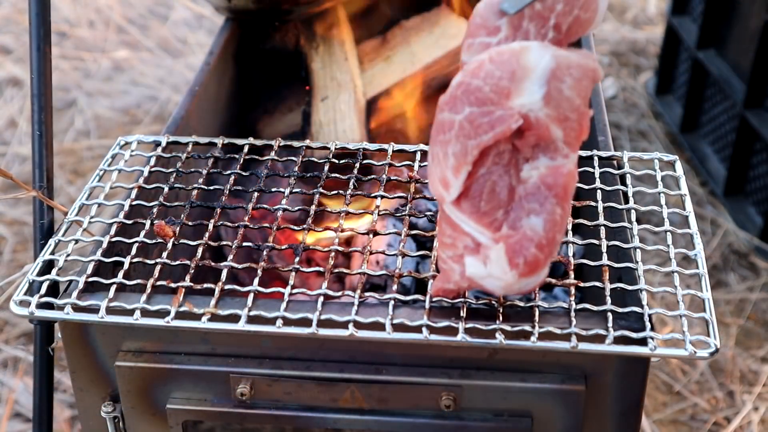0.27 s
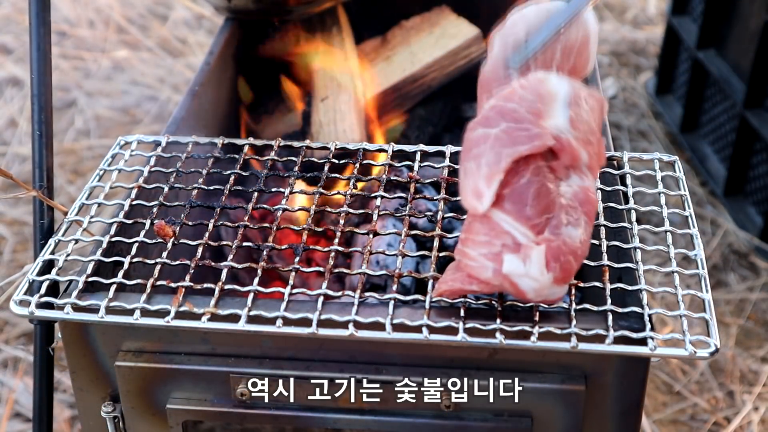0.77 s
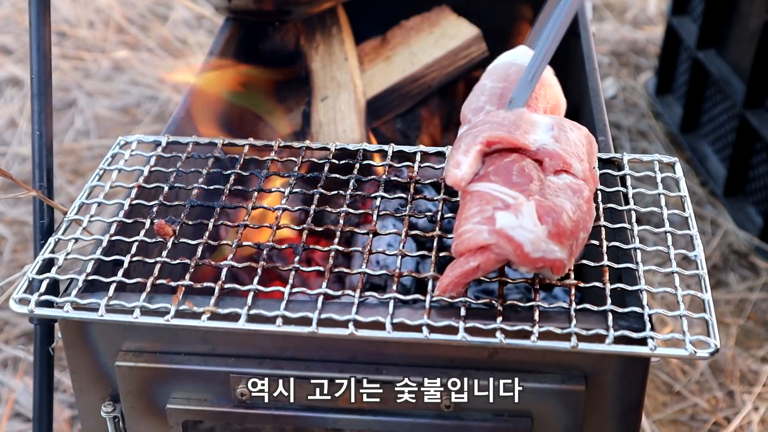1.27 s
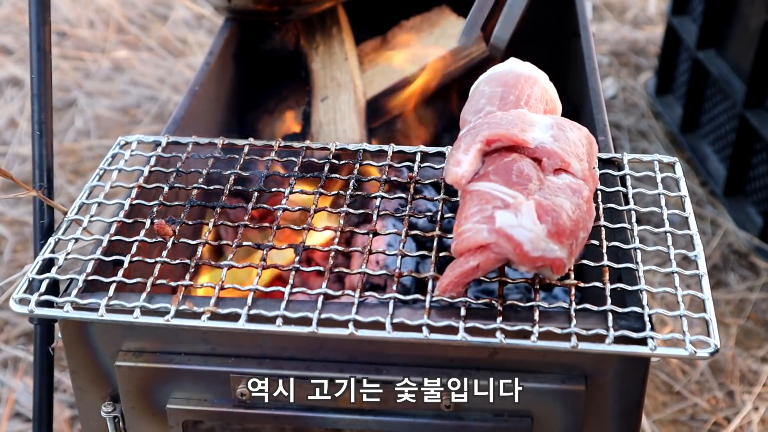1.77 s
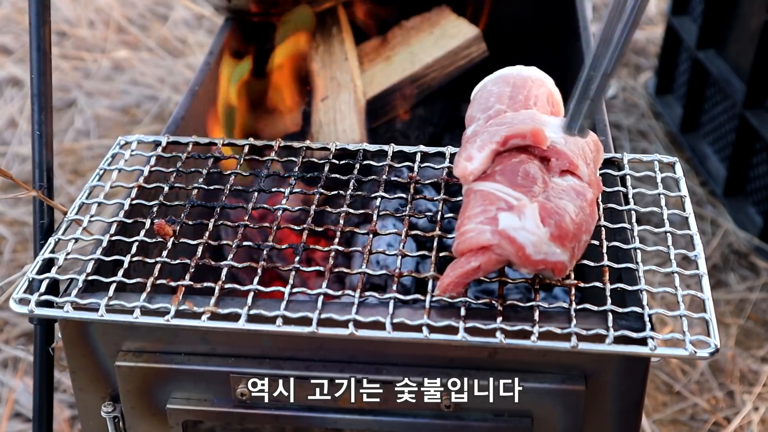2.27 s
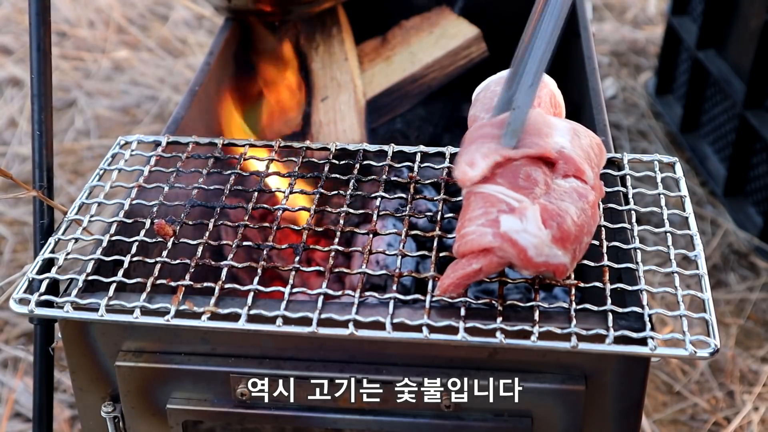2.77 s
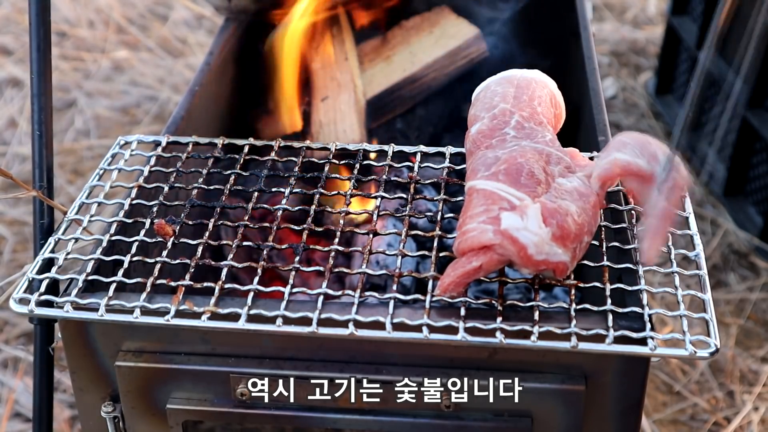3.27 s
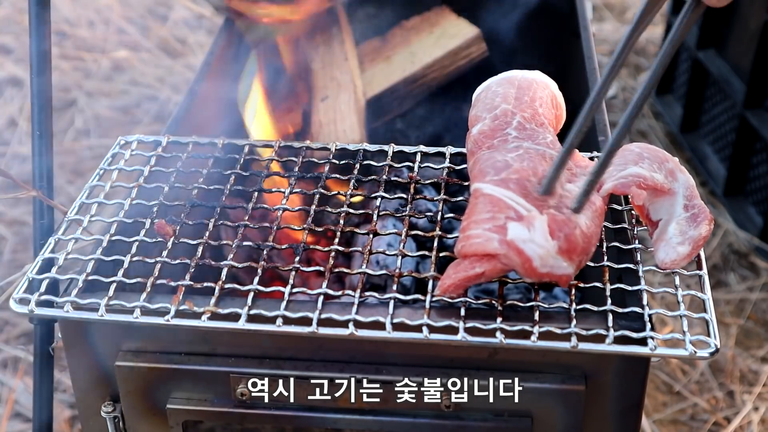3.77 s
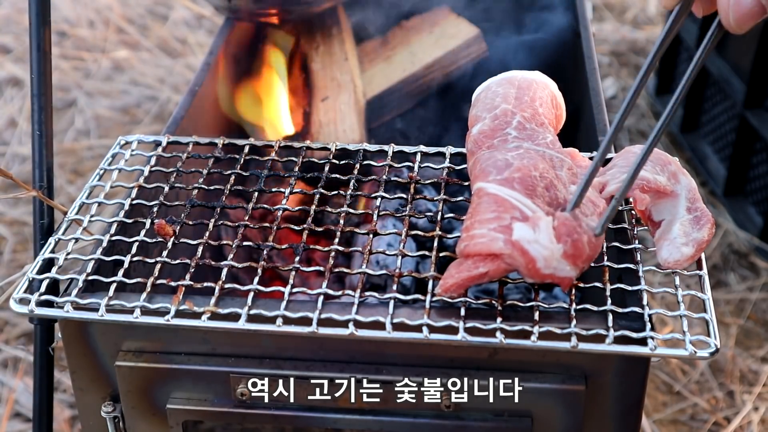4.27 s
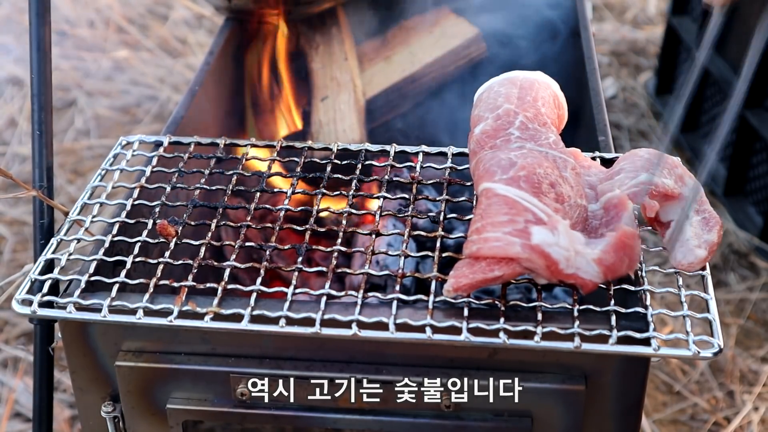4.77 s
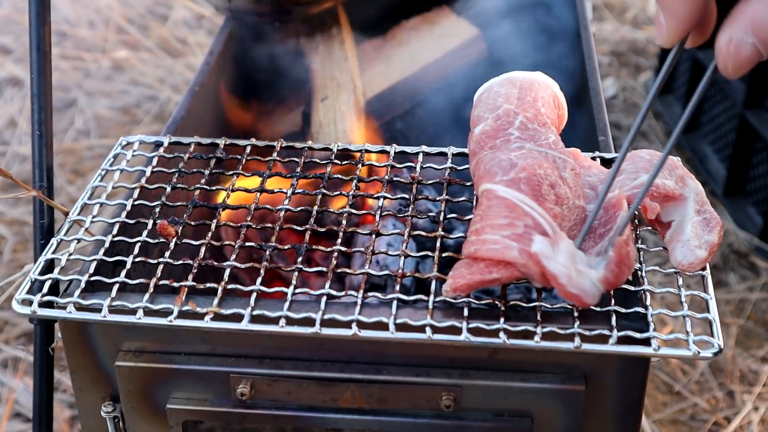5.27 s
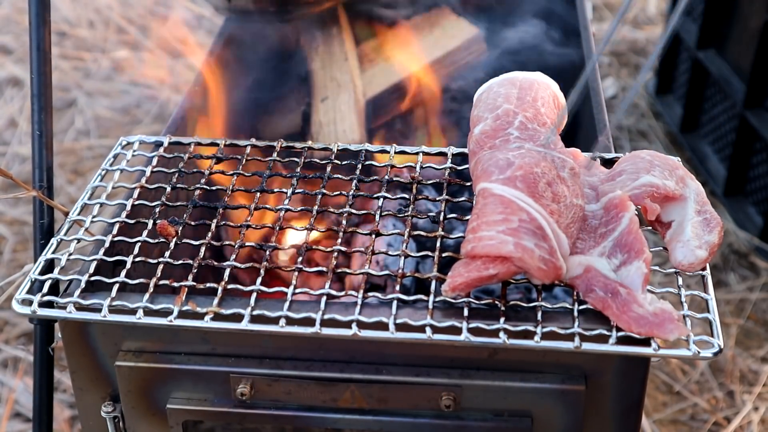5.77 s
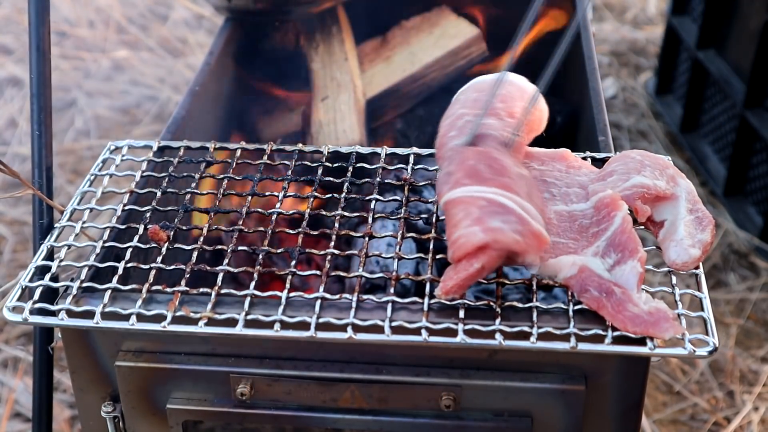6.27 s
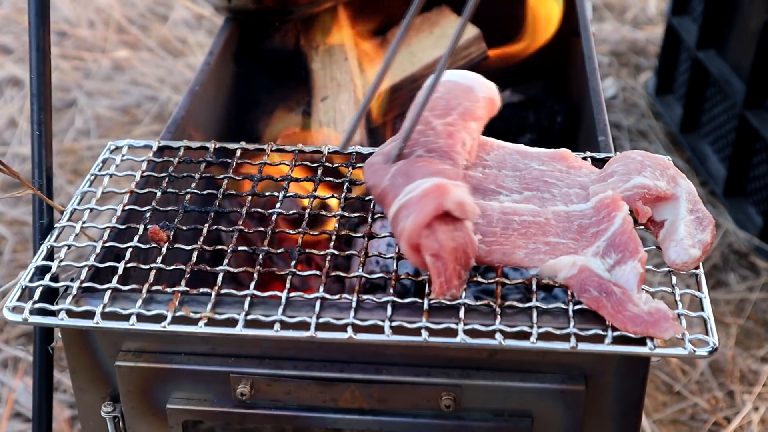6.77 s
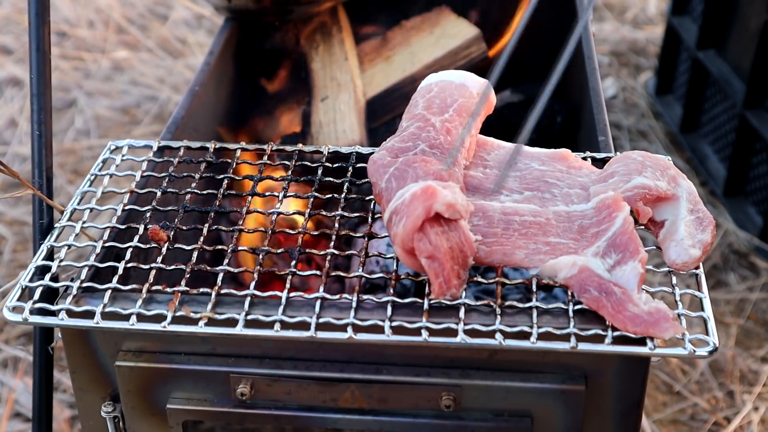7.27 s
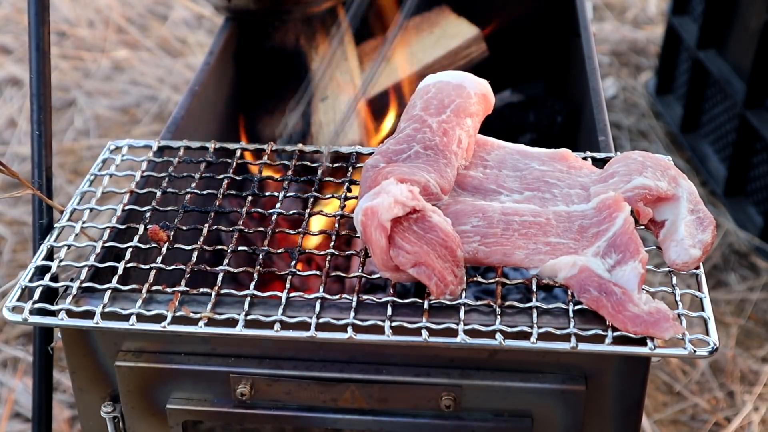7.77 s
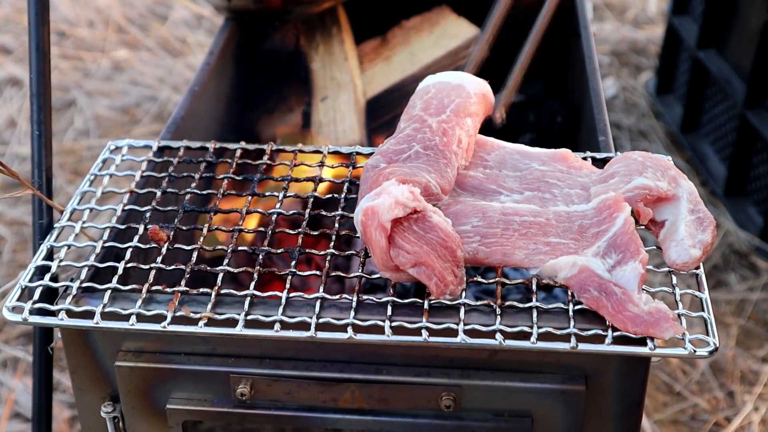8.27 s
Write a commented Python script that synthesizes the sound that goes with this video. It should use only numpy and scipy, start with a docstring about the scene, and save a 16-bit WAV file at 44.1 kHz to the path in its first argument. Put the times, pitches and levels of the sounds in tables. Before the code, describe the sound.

Very close, dry outdoor sound of pork on a wire grate over a small wood and charcoal fire. At 0-0.7 s meat rubs the wires, tongs tink lightly, two dull metal knocks come at 0.2 and 0.45 s, flames puff and the first brief sizzles spit. Around 1.07 s a loud, rattling double steel clank lands as sizzling swells. From 1.2 to 4 s bright hiss comes in waves, with crisp fat pops, a strong one near 2.3 s, and a tiny wood tick at 3.1 s. At 4.3 s a log cracks with a loud dry knock. The sizzle thins near 5-6 s; then around 6.2 s meat drags softly and flames puff and hoot upward. From 6.4 s frying is fuller and steamier, with a sharp thin snap at 7.0 s, a flame puff at 7.2 s, popping fat and a last hissing surge near 8.4 s.

```python
"""Pork slices sizzle on a wire grate: swells of tiny bubble bursts and steam hiss, with sharper fat spits.
A small wood and charcoal fire flutters underneath: filtered noise roars and rushes, gas pockets puff,
flame tongues hoot at climbing pitches. Noise bursts and decaying modes make the steel clank, loudest near
1 s, the wire tink and the burning wood snap three times. Meat drags over the wires as jerky noise."""
import sys
import numpy as np
from scipy import signal
from scipy.fft import rfft, irfft
from scipy.io import wavfile
from scipy.ndimage import uniform_filter1d

SR = 44100
rng = np.random.default_rng(int(sys.argv[2]) if len(sys.argv) > 2 else 0)


def digitize_waveform(pressure):
    """Quantize a signal to 16-bit integers and store it at the path in sys.argv[1].

    Rows of a 2-D input are taken as channels; values are limited to [-1, 1].
    """
    field = np.atleast_2d(pressure).T
    bounded = np.clip(field, -1, 1)
    quanta = np.round(bounded * 32767).astype(np.int16)
    wavfile.write(sys.argv[1], SR, quanta)


N = 375732
TIME = np.arange(N) / SR
FINE_HZ = 10500  # the finest spray lies above this

# spectrum of the fine spray: hz, level_db
SPRAY_SPECTRUM = [(2400, -28.5), (5100, -10), (6850, -3.5), (7600, 0.2), (8350, 2.5), (9250, -2.5),
                  (10400, -8), (11300, -4), (12400, -2), (13600, -1.2), (14900, -14), (15700, -4)]
# spectrum of the coarse frying: hz, level_db
FRYING_SPECTRUM = [(300, -17.5), (620, -6), (800, -2), (1000, -10), (1300, 1.5), (1550, -0.5), (1820, -0.5),
                   (2350, -3), (2780, 2), (3000, -1), (3700, 2), (4300, 0.5), (4950, 4.5), (5600, 2),
                   (6200, 3), (6800, 1), (10000, -5.5)]


def undb(db):
    """Decibels to gain."""
    return 10 ** (np.asarray(db) / 20)


def unit(x):
    """Scale to rms 1."""
    return x / np.sqrt(np.mean(x ** 2))


def curves(table):
    """Each column of a curve table, interpolated sample by sample."""
    s, *columns = np.transpose(table)
    return [np.interp(TIME, s, column) for column in columns]


def add(track, start_s, sound):
    """Mix a short sound into a track."""
    start = max(int(start_s * SR), 0)
    track[start:start + len(sound)] += sound[:max(N - start, 0)]


def response(spectrum, size=4096):
    """Minimum-phase impulse response of a spectrum, with unit energy."""
    hz, db = np.transpose(spectrum)
    bins_hz = np.maximum(np.arange(size // 2 + 1) * SR / size, 1)
    gain = undb(np.interp(np.log(bins_hz), np.log(hz), db))
    cepstrum = irfft(np.log(gain))
    # fold the cepstrum to make the response causal
    cepstrum[1:size // 2] *= 2
    cepstrum[size // 2 + 1:] = 0
    h = irfft(np.exp(rfft(cepstrum)))
    return h / np.sqrt(np.sum(h ** 2))


def colour(x, spectrum):
    """Filter a sound with a spectrum."""
    return signal.oaconvolve(x, response(spectrum))[:len(x)]


def highpass(x, hz, order=2):
    """Take away the bass below hz."""
    return signal.sosfilt(signal.butter(order, hz, "high", fs=SR, output="sos"), x)


def walk(rate_hz):
    """Slow chance: random levels joined by ramps, rms 1."""
    step = max(int(SR / rate_hz), 1)
    levels = np.repeat(rng.standard_normal(N // step + 1), step)
    return unit(uniform_filter1d(levels, step)[:N])


def flurries(rate_hz, decay_s):
    """Chance that jumps up at random moments and dies back; mean 0, spread 1."""
    jumps = (rng.random(N) < rate_hz / SR) * rng.uniform(0.59, 1, N)
    level = np.sqrt(signal.lfilter([1], [1, -np.exp(-1 / (decay_s * SR))], jumps))
    return unit(level - np.mean(level))


def bursts(rate_hz, spread_db, limit=4):
    """Random impulses of either sign, with exponentially spread levels in dB; rms 1."""
    happens = rng.random(N) < rate_hz / SR
    size = undb(spread_db * np.minimum(rng.exponential(size=N), limit))
    return unit(happens * size * rng.choice([-1, 1], N))


def strays(level_db, over_db, spread_db, count):
    """Small events at random moments that follow a level: start_s, level_db, a deviation of spread 1."""
    at = rng.integers(0, N, count)
    size, deviation = rng.standard_normal((count, 2)).T
    event_db = level_db[at] + over_db + spread_db * np.clip(size, -2, 1.5)
    return zip(at / SR, event_db, deviation)


def ring(modes, t, disorder=0):
    """Free ringing of hz, level_db, t60_s modes; disorder puts the higher ones out of step."""
    hz = np.transpose(modes)[0]
    phases = disorder * 2 * np.pi * rng.random(len(modes)) * np.minimum(hz / 1000, 1) ** 2
    total = np.zeros(len(t))
    for (f, db, t60_s), phase in zip(modes, phases):
        total += undb(db) * np.sin(2 * np.pi * f * t + phase) * np.exp(-np.log(1000) * t / t60_s)
    return total


def crack(t, tail, decay_s):
    """One impulse and a short scatter from the surfaces nearby."""
    x = tail * rng.standard_normal(len(t)) * np.exp(-t / decay_s)
    x[0] = 1
    return x


def envelope(start_s, rise_s, hold_s, fall_s):
    """A rounded rise, a hold and an exponential fall."""
    age = TIME - start_s
    up = np.clip(age / rise_s, 0, 1)
    return up * (2 - up) * np.exp(-np.clip((age - rise_s - hold_s) / fall_s, 0, 20))


def together(parts):
    """Power sum of (gain, colour_db) parts: its level and its colour, both in dB."""
    power = sum(gain * gain for gain, _ in parts)
    coloured = sum(gain * gain * undb(db) ** 2 for gain, db in parts)
    return 10 * np.log10(power), 10 * np.log10(coloured / power)


def boiling():
    """Strength and freshness of the boil in dB: a simmer, and a swell at each touch of meat on hot wire."""
    # steady simmer of the meat on the grate: start_s, level_db
    simmer = [(0, -52), (.62, -52.5), (.85, -39.5), (2.3, -43.5), (3.05, -43.5), (3.6, -43.5), (4.9, -44),
              (5.7, -47.5), (6.0, -47), (6.4, -36), (7.3, -37), (8.5, -38.5)]
    # juice boils up, finer on fresh meat: start_s, level_db, rise_s, hold_s, fall_s, freshness_db
    swells = [(.17, -48, .1, .06, .04, 0), (0.273, -37.5, 0.11, 0.031, 0.019, 8),
              (0.499, -43.5, .005, 0.0056, 0.026, 8), (0.655, -39.5, 0.012, 0.089, 0.06, 6.5),
              (0.762, -34.5, 0.12, 0.33, 0.036, 2.5), (1.035, -29, 0.063, 0.079, 0.082, 2.5),
              (1.23, -33.5, 0.017, 0.024, 0.086, 1.5), (1.4, -40, 0.035, 0.27, 0.062, 2),
              (1.746, -36.5, 0.047, 0.23, .05, 2.5), (2.047, -29.5, 0.091, 0.023, 0.13, 2.5),
              (2.703, -40, 0.23, 0.029, .015, 3), (3.142, -33, 0.018, 0.11, 0.072, 2.5),
              (3.742, -39.5, 0.082, 0.09, 0.12, 1), (4.181, -39.5, 0.053, 0.084, 0.054, 1),
              (4.393, -35, 0.18, 0.028, 0.085, -2.5), (5.18, -41, 0.17, 0.044, 0.026, 1),
              (5.416, -35, 0.055, 0.019, 0.092, 2.5), (6.025, -43.5, .005, 0.03, 0.027, -11),
              (6.062, -37.5, 0.16, 0.25, 0.041, -1), (6.316, -34, 0.064, 0.32, .05, 0),
              (6.647, -30, 0.11, 0.19, 0.16, 0.5), (7.408, -33.5, 0.016, 0.24, 0.32, 0),
              (8.347, -27.5, 0.097, 0.028, 0.076, 3.5)]
    simmer_db, = curves(simmer)
    parts = [(undb(simmer_db), 2)]  # simmer freshness, dB
    for s, db, rise_s, hold_s, fall_s, fresh_db in swells:
        parts.append((undb(db) * envelope(s, rise_s, hold_s, fall_s), fresh_db))
    return together(parts)


def fizzle(grains, share, decay_s):
    """Each burst trails off in its own brief noise fizz, with a share of its energy."""
    pole = np.exp(-1 / (decay_s * SR))
    power = signal.lfilter([1 - pole], [1, -pole], grains ** 2)
    return unit(grains + np.sqrt(share * power) * rng.standard_normal(N))


def steamy(grains, steam_db):
    """Bursts mixed with a hiss of steam, at constant power."""
    return (grains + undb(steam_db) * rng.standard_normal(N)) / np.hypot(1, undb(steam_db))


def scatter(x, share, count=8):
    """Short echoes off meat, tongs and firebox come and go, so the colour keeps shifting."""
    lags = np.geomspace(.0008, .005, count) * SR
    echoes = sum(walk(2.6) * np.roll(x, int(lag)) for lag in lags)
    return unit(x + share * echoes)


def resonate(centre_hz, width_hz):
    """Noise in a resonance whose centre may move every sample."""
    pole = np.exp(-np.pi * width_hz / SR)
    noise = rng.standard_normal(N) + 1j * rng.standard_normal(N)
    baseband = signal.lfilter([1], [1, -pole], noise)
    return unit((baseband * np.exp(2j * np.pi * np.cumsum(centre_hz) / SR)).real)


def blisters(count, low_hz, high_hz, cycles, spread_db):
    """Larger bubbles of fat, each a tiny decaying ping at its own pitch."""
    t = TIME[:300]
    when, pitch, size = rng.random((count, 3)).T[:, :, None]
    hz = low_hz * (high_hz / low_hz) ** pitch
    gain = undb(-spread_db * np.log(size + 0.02))
    pings = gain * np.sin(2 * np.pi * hz * t) * np.exp(-t * hz / cycles)
    places = (when * N).astype(int) + np.arange(len(t))
    return unit(np.bincount(places.ravel(), pings.ravel(), N)[:N])


def sizzle(level_db, fresh_db):
    """Tiny bubbles burst over a hiss of steam; each burst has a bright spray and a coarser body."""
    # the gap under the meat rings faintly and changes as slices move: start_s, centre_hz, level_re_frying_db
    gap_curve = [(.5, 3560, -18), (1.1, 3680, -10), (1.35, 3487, -15), (2.3, 3404, -12.5),
                 (3.2, 3335, -9.5), (4.15, 3220, -13), (4.35, 2770, -9), (5.1, 2720, -37), (5.35, 3760, -9),
                 (6.0, 3780, -25), (6.6, 3766, -11.5), (8.5, 3835, -18)]
    # frying spectrum once the slices lie flat: hz, level_db
    flat_spectrum = [(300, -8), (620, -14), (820, -1.5), (1000, -17), (1280, 3.5), (1600, 2), (1900, 0),
                     (2200, -2), (2480, -4), (2850, 1.5), (3250, 0.5), (3750, 2), (4250, -0.5), (5150, 4),
                     (6500, -1), (10000, -11)]
    flat_s, flatten_s = 6.3, 0.14  # the slices are pulled flat across the grate: start, duration
    usual_boil_db, usual_bursts_hz = -37.5, 1800
    steam_db, flat_steam_db = -4.5, 5.5  # hiss re bursts, and its gain once flat

    gap_hz, gap_db = curves(gap_curve)
    flat = np.clip((TIME - flat_s) / flatten_s, 0, 1)
    hiss_db = steam_db + flat_steam_db * flat
    vigour_db = level_db - usual_boil_db
    # the coarse part falls behind as the boil grows and on fresh meat
    coarse_db = -4 - 0.23 * vigour_db - 0.56 * fresh_db

    # strong boiling has more bursts, so it sounds smoother
    rate_hz = usual_bursts_hz * undb(.35 * vigour_db)
    grains = bursts(rate_hz, spread_db=2.8, limit=5.0) / np.sqrt(rate_hz / np.mean(rate_hz))
    grains = grains * undb(1.0 * walk(160))  # little clusters, 1 dB deep
    grains = fizzle(grains, share=0.37, decay_s=0.0043)

    mist = scatter(steamy(grains, hiss_db), share=.06)
    spray = unit(colour(mist, SPRAY_SPECTRUM))
    finest = signal.sosfiltfilt(signal.butter(3, FINE_HZ, "high", fs=SR, output="sos"), spray)
    spray = unit(spray + (undb(fresh_db) - 1) * finest)

    boil = scatter(steamy(grains, hiss_db), share=.12)
    heaped_frying = unit(colour(boil, FRYING_SPECTRUM))
    flat_frying = unit(colour(boil, flat_spectrum))
    frying = (1 - flat) * heaped_frying + flat * flat_frying
    pings = blisters(count=2600, low_hz=1360, high_hz=9360, cycles=9.3, spread_db=5)
    gap = resonate(gap_hz, width_hz=300)
    coarse = unit(frying + undb(gap_db + 2 * walk(18)) * gap + undb(-18.5) * pings)
    coarse_db = coarse_db + 0.95 * flurries(49, decay_s=0.014)  # the frying also flickers alone

    # juice reaches the wire in quick and slower flurries
    uneven_db = 1.12 * flurries(62, decay_s=0.0025) + 0.78 * flurries(26, decay_s=0.029)
    return undb(level_db + uneven_db) * (undb(0.5) * spray + undb(coarse_db) * coarse)


def burning():
    """Strength and rush of the fire in dB: calm burning that licks up now and then, and gusts."""
    # the fire between gusts: start_s, level_db
    calm = [(0, -51.5), (.8, -52.5), (1.7, -52), (2.6, -54.5), (4.3, -54), (5.4, -55), (6.4, -51),
            (8.0, -55), (8.5, -50)]
    # gusts, with the rush of fast gas: start_s, length_s, level_db, rush_re_level_db
    gusts = [(-.03, 0.21, -46.5, -3.5), (0.215, 0.15, -41.5, 0.5), (0.414, 0.25, -43.5, -3.5),
             (0.927, 0.029, -45, 3), (1.227, 0.27, -46.5, -5), (1.477, 0.16, -46.5, -5),
             (1.863, 0.024, -60, 11), (2.15, 0.017, -49, -7), (2.373, 0.17, -47.5, -11),
             (2.8, 0.051, -46, -12), (2.84, 0.15, -63, 5), (3.17, 0.046, -57, -18), (3.27, 0.069, -48, -12),
             (3.97, 0.15, -50.5, -18), (4.552, 0.071, -51, -11), (4.784, 0.057, -42.5, 1.5),
             (4.99, 0.16, -47.5, -10), (5.54, 0.15, -47.5, -9), (5.705, 0.18, -46.5, -2.5),
             (6.05, 0.07, -46.5, 4.5), (6.115, 0.1, -43, 5.5), (6.344, 0.59, -62, 3),
             (7.158, 0.24, -46, -0.5), (7.402, 0.43, -48, -1.5), (7.87, 0.021, -54, 15.5),
             (8.411, 0.13, -43, -18)]
    rise_share, fall_s = 0.32, 0.017  # part of its length that a gust takes to build; its dying away
    calm_db, = curves(calm)
    licks_db = 2 * flurries(10, decay_s=0.033)
    parts = [(undb(calm_db + licks_db), 0)]  # calm rush, dB
    for s, length_s, db, rush_db in gusts:
        shape = envelope(s, rise_share * length_s, (1 - rise_share) * length_s, fall_s)
        parts.append((undb(db) * shape, rush_db))
    return together(parts)


def flames(level_db, rush_db):
    """Turbulent burning: an uneven low roar, and a higher rush when the gas speeds up."""
    # low roar: hz, level_db
    roar_spectrum = [(15, -24), (35, -5.5), (70, 0), (135, 1), (220, -4.5), (330, -13.5), (500, -16.5),
                     (800, -21), (1600, -30)]
    # rush of fast gas: hz, level_db
    rush_spectrum = [(150, -8), (300, -5), (430, 3.5), (600, -6), (900, -10.5), (1300, -11), (4000, -34)]
    flutter = bursts(260, spread_db=9.0, limit=2.95) + undb(-4.0) * rng.standard_normal(N)
    roar = undb(-1.5) * unit(colour(flutter, roar_spectrum))
    turbulence = bursts(500, spread_db=4.5, limit=3.9) + rng.standard_normal(N)
    rush = undb(rush_db - 4.5) * unit(colour(turbulence, rush_spectrum))
    return undb(level_db) * (roar + rush)


def rustle():
    """Meat sticks and slips softly over the wires in little jerks."""
    # bell-shaped drags: centre_s, half_width_s (to 1/e), level_db
    drags = [(0.092, 0.13, -47.5), (0.325, 0.04, -55), (4.815, .022, -52), (6.17, 0.054, -48)]
    # rubbing noise: hz, level_db
    rub_spectrum = [(400, -12), (700, 8), (970, 9.5), (1300, 5), (2100, 5.5), (3500, 0), (6000, 1.5),
                    (10000, -16.5)]
    drag = sum(undb(db) * np.exp(-((TIME - s) / half_width_s) ** 2) for s, half_width_s, db in drags)
    rub = colour(bursts(900, spread_db=-2.5), rub_spectrum)
    return drag * unit(undb(2.2 * walk(60)) * rub)


def puffs(roar_db):
    """A pocket of gas flares: one push of pressure, a shallow suction, and a short flutter in its wake."""
    # the largest pockets that catch fire: start_s, level_db, pitch_hz
    large = [(.034, -31, 380), (.192, -26, 360), (.229, -37, 350), (.26, -32, 400), (.303, -28, 400),
             (.32, -25, 350), (.337, -27, 334), (.397, -23, 400), (.454, -25, 260), (.525, -25, 300),
             (.557, -28, 280), (.59, -38, 300), (.608, -22, 340), (.956, -34, 330), (1.231, -32, 280),
             (1.429, -32, 260), (1.523, -24, 350), (1.55, -28, 230), (1.586, -26, 280), (1.604, -32, 350),
             (1.886, -30, 520), (2.072, -33.5, 380), (2.174, -35, 260), (2.458, -20.5, 293),
             (2.811, -27, 370), (2.883, -32, 400), (2.902, -29.5, 380), (2.989, -33, 400),
             (3.001, -32, 430), (3.091, -32, 380), (3.21, -34, 230), (3.314, -36, 300), (3.337, -41, 300),
             (3.391, -26, 320), (3.565, -36, 300), (3.572, -37, 300), (3.995, -32, 264),
             (4.573, -28.5, 288), (4.606, -26, 340), (4.82, -31, 380), (5.563, -35, 230),
             (5.601, -29.5, 320), (5.627, -29, 280), (5.637, -25.5, 270), (5.666, -36, 260),
             (5.727, -20, 276), (5.735, -34, 330), (5.772, -25.5, 260), (5.80, -27, 360), (6.067, -36, 380),
             (6.148, -25, 250), (6.211, -32, 380), (6.246, -17, 487), (6.259, -26, 380), (6.268, -22, 180),
             (6.294, -23, 564), (6.894, -34, 350), (6.955, -32, 300), (7.147, -35, 280), (7.198, -23, 368),
             (7.239, -31, 240), (7.26, -27, 260), (7.294, -31, 242), (7.322, -30, 300), (7.347, -30, 282),
             (7.385, -33, 300), (7.504, -30, 328), (7.552, -23.5, 405), (7.579, -32, 320),
             (7.594, -34, 330), (7.73, -29, 280), (7.887, -34, 453), (8.497, -31, 350)]
    usual_hz = 342
    wake_db, wake_rise_s = -20, 0.0033
    out, t = np.zeros(N), TIME[:2560]
    lead_s = TIME[512]  # room for the push to build before its peak
    age = np.maximum(t - lead_s, 0) / wake_rise_s
    wake = undb(wake_db) * age * np.exp(1 - age)
    chance = strays(roar_db, over_db=9, spread_db=3, count=32)
    small = [(s, db, usual_hz * np.exp(0.14 * z)) for s, db, z in chance]
    for s, db, hz in list(large) + small:
        u = (t - lead_s) * hz * 5.22
        push = np.exp(-u ** 2) - 0.14 * np.exp(-((u - 1.2) / 5.1) ** 2)
        band = signal.butter(2, [0.52 * hz, 1.54 * hz], "band", fs=SR, output="sos")
        eddies = unit(signal.sosfilt(band, rng.standard_normal(len(t))))
        add(out, s - lead_s, undb(db) * (push + wake * eddies))
    return highpass(out, hz=55)


def taps():
    """Light touches of the tongs make a wire tink in its decaying modes."""
    # touches: start_s, peak_db
    touches = [(.0868, -32), (.0895, -37), (0.111, -35), (4.776, -48)]
    # modes of the wire: hz, level_db, t60_s
    wire_modes = [(994, -1, 0.056), (1030, -4, 0.036), (1480, -10, .02), (2060, -3, .025),
                  (2420, 3.5, 0.018), (3400, -6, .012), (5060, -9, .01)]
    out = np.zeros(N)
    for s, db in touches:
        tink = ring(wire_modes, TIME[:4096], disorder=0.97)
        add(out, s, undb(db) * tink / np.max(np.abs(tink)))
    return out


def clanks():
    """Each blow rattles the grate densely and rings the steel until it is damped."""
    # blows on the steel, deadened by the meat: start_s, level_db, rattle_decay_s
    blows = [(0.196, -19, 0.002), (0.445, -19, 0.003), (1.0644, -2, 0.011), (1.0712, -2.5, 0.019),
             (1.0917, -7.5, 0.018)]
    # modes of the steel before that damping: hz, level_db, t60_s
    steel_modes = [(443, 4, .22), (474, 0, .22), (762, -5, .35), (940, -5, .2), (974, -.5, .3),
                   (1010, -2, .3), (1072, -8, .3), (1244, -11, .4), (1277, -5, .4), (1671, -4.5, .5),
                   (1770, -3, .5), (2339, -8, .3), (2433, -11, .3), (2780, -3.5, .4), (2952, -7, .35),
                   (3178, -9, .2), (3488, -10, .25), (3668, -11, .3), (3898, -9, .1), (4203, -10, .4),
                   (4355, -11, .2), (5230, -11, .2), (5830, -11, .15)]
    # rattle: hz, level_db
    thud_spectrum = [(50, -30), (130, 0), (340, -6.5), (450, 6), (610, -7), (780, -3), (950, 5), (1130, -3),
                     (1700, 1), (2000, -4), (2800, -3), (4000, -4), (5800, -6), (6500, -15), (15000, -23)]
    out, t = np.zeros(N), TIME[:SR // 4]
    for s, db, decay_s in blows:
        contacts = rng.standard_normal(len(t)) * (rng.random(len(t)) < 3800 / SR)
        rattle = unit(colour(contacts, thud_spectrum)) * np.exp(-t / decay_s)
        steel = ring(steel_modes, t, disorder=0.87) * np.exp(-t / (3.0 * decay_s))
        onset = 1 - np.exp(-t / (0.08 * decay_s))
        add(out, s, undb(db) * onset * (undb(-17.0) * rattle + undb(-26.5) * steel))
    return out


def spits(boil_db):
    """Single drops of fat burst with a sharp tick and a brief fizz; each has its own colour."""
    # the loudest drops, and at 1.066 s the bright crack of the first heavy blow on the steel: start_s,
    # level_db, low_body_re_top_db, finest_spray_lift_db
    large = [(.2924, -25, 3, 0), (.3618, -13, -18, 10), (.392, -17, -13, 4), (.4092, -16, -17, 12),
             (.4181, -17, -17, 10), (.5087, -16.5, -16, 8), (.58, -24, -7, 3), (.666, -18.5, -8, 2),
             (.6842, -13, -11, -1), (.6955, -23, -20, -2), (.7135, -16, -8, 3), (.719, -25, -5, 3),
             (.7444, -17, -24, 5.5), (.7823, -16, -17, 6), (.919, -17, -19, 8), (1.066, -10.5, -12, -5),
             (1.141, -17, -12, -1), (1.1859, -14, -10, 1), (1.1914, -22, -17, 5), (1.365, -19, -2, -3),
             (1.6204, -14, -3, 3), (1.6364, -21, -11, 4), (1.862, -15, -8, 0), (1.871, -14, -15, 2),
             (1.9237, -16, -14, 3), (2.025, -14, -14, 1), (2.1783, -12, -2, 1), (2.2315, -30, -28, -2),
             (2.307, -8.5, -10, 8), (2.5922, -25, 7, -1), (2.691, -25, -5, 4), (2.7558, -21.5, 4, -2),
             (2.806, -25, -3, 4), (2.894, -18, -14, 8), (2.9373, -12, 2.5, 2), (2.9439, -18, -12, 5),
             (2.9755, -22, 1, -3), (3.152, -16, -13, 7), (3.1639, -14, -8, 5), (3.194, -17, -4, 4),
             (3.212, -15, -2, 1), (3.339, -19, -8, 8), (3.349, -17, -18, 3), (3.389, -13, -5.5, 6),
             (3.3974, -30, -3, 3), (3.5905, -16.5, -1, 4), (3.841, -13.5, -8, 2), (3.846, -23, -14, 2),
             (3.9218, -22, -20, -14), (4.3667, -40, -14, -2), (4.3936, -22, -10, -2), (4.4183, -17, -3, 0),
             (4.4415, -21, -11, 5), (4.6064, -20, -12, -1), (4.879, -17.5, -11, 7), (5.2487, -22, -4, -3),
             (5.2986, -23.5, -20, -2), (5.362, -19, -6, 3), (5.509, -25, -12, 4), (5.541, -17, 3, -2),
             (5.602, -23, -1, -2), (5.7815, -35, -12, -5), (5.93, -18.5, -12, 6), (5.9845, -31, -14, 1),
             (6.544, -18, 3, -2), (6.583, -19, 5, 0), (6.7125, -19, -4, 0), (6.961, -12, -10, -1),
             (7.083, -19, 6, 0), (7.2593, -17, 3, -7), (7.456, -15, -4, 6), (7.492, -21, -4, 1),
             (7.53, -16, -16, 15), (7.735, -10.5, -6, 2), (7.789, -22, 8, 7), (7.8393, -17.5, 5, 3),
             (8.2903, -16.5, -9, 3)]
    out, t = np.zeros(N), TIME[:1024]
    body = highpass(response(FRYING_SPECTRUM, size=256), hz=900)
    chance = strays(boil_db, over_db=6, spread_db=4, count=60)
    small = [(s, db, -17 + 5 * z, 3 * rng.standard_normal()) for s, db, z in chance]
    for s, db, body_db, fine_db in list(large) + small:
        lifted = [(hz, level_db + fine_db * (hz > FINE_HZ)) for hz, level_db in SPRAY_SPECTRUM]
        tick = response(lifted, size=256) + undb(body_db) * body
        fizz = crack(t, tail=.07, decay_s=.0014)
        fizz = fizz + .018 * rng.standard_normal(len(t)) * np.exp(-t / .006)
        add(out, s, undb(db + 7.5) * np.convolve(fizz, tick / np.max(np.abs(tick))))
    return out


def snaps():
    """A steam pocket splits the log: a dry knock with a sharp edge; the smaller the split, the less bass."""
    # splits: start_s, peak_db, edge_re_knock_db, pitch_factor, thin_below_hz
    splits = [(3.1024, -21.5, -15, 1.1, 4000), (4.278, 0.2, -6.5, 1.0, 240), (7.0197, -3, 3.5, 0.99, 3000)]
    # modes of the log at pitch factor 1: hz, level_db, t60_s
    wood_modes = [(540, -15, 0.046), (830, 5, 0.013), (1260, -2, 0.016), (1810, -2, 0.017),
                  (2160, 3, 0.0061), (2690, 9.5, 0.004), (3210, 8, 0.0066), (3870, 0, 0.011),
                  (4350, -3, 0.0064), (5640, -1.5, 0.0092), (7430, 0, 0.0071), (8770, 9, 0.0053),
                  (12700, -26, 0.0027)]
    out, t = np.zeros(N), TIME[:2048]
    for s, db, edge_db, pitch, thin_hz in splits:
        knock = highpass(ring(wood_modes, t * pitch), hz=405)
        knock = highpass(knock, thin_hz, order=1)
        edge = colour(crack(t, tail=.17, decay_s=.001), SPRAY_SPECTRUM)
        snap = undb(edge_db) * edge / np.max(np.abs(edge)) + knock / np.max(np.abs(knock))
        add(out, s, undb(db) * snap / np.max(np.abs(snap)))
    return out


def flares():
    """Each tongue of flame hoots briefly at a wavering pitch that climbs as the gas heats."""
    # tongues of flame: start_s, peak_db, start_pitch_hz, rise_s
    tongues = [(6.088, -47, 350, 0.0092), (6.112, -37, 360, 0.014), (6.146, -28.5, 375, 0.0073),
               (6.18, -37, 380, 0.006), (6.197, -38, 472, .008), (7.194, -26.5, 390, 0.0022)]
    climb_share, climb_s = 0.29, 0.015
    out = np.zeros(N)
    for s, db, hz, rise_s in tongues:
        age = np.maximum(TIME - s, 0)
        climb = climb_share * (1 - np.exp(-age / climb_s))
        phase = 2 * np.pi * np.cumsum(hz * (1 + climb + 0.11 * walk(160))) / SR
        out += undb(db) * age / rise_s * np.exp(1 - age / rise_s) * np.sin(phase)
    return out


def scene():
    """The grill in the open air, with no room around it."""
    boil_db, fresh_db = boiling()
    roar_db, rush_db = burning()
    meat = sizzle(boil_db, fresh_db) + spits(boil_db)
    fire = flames(roar_db, rush_db) + puffs(roar_db) + flares() + snaps()
    handling = rustle() + taps() + clanks()
    return (meat + handling + fire)[None]


def record(dry):
    """The recorder clips at full scale and cuts the top above 15750 Hz."""
    top_cut = signal.ellip(10, .1, 70, 15750, fs=SR, output="sos")
    return signal.sosfilt(top_cut, np.clip(dry, -1, 1))


dry = scene()
out = record(dry)
digitize_waveform(out)
```